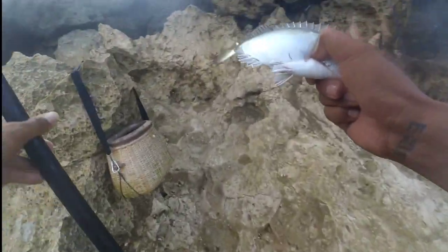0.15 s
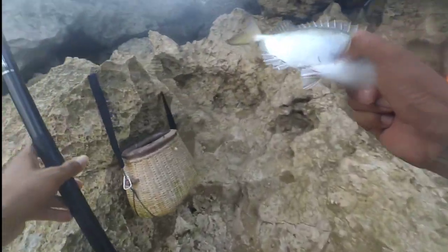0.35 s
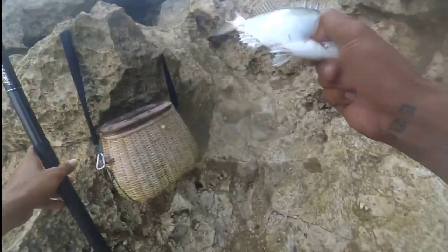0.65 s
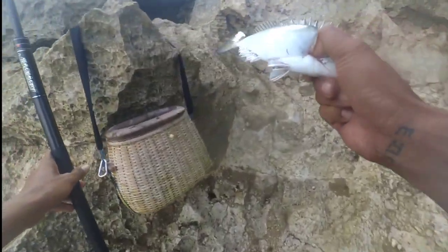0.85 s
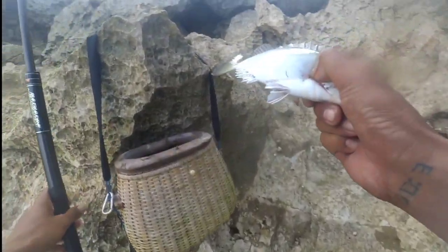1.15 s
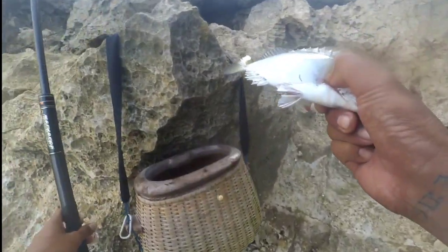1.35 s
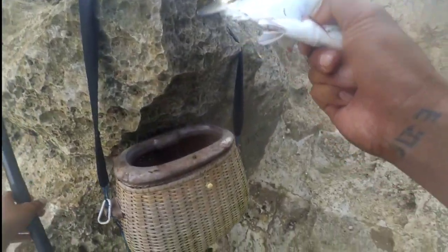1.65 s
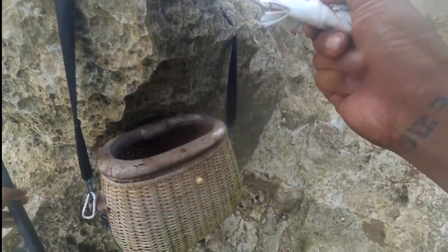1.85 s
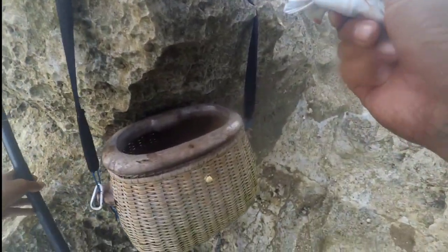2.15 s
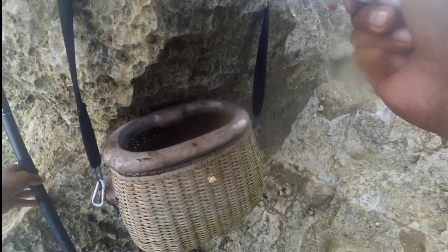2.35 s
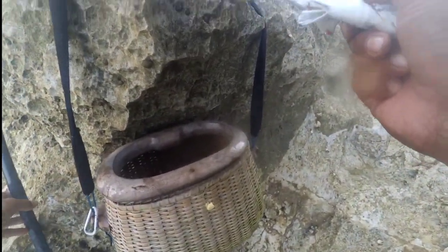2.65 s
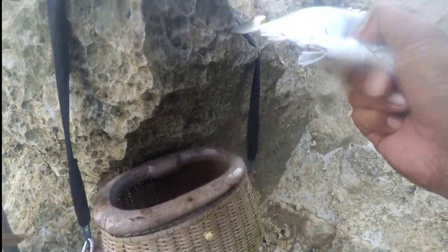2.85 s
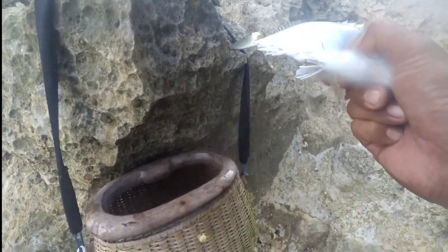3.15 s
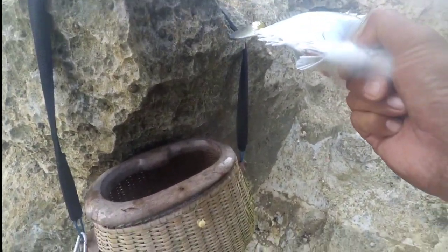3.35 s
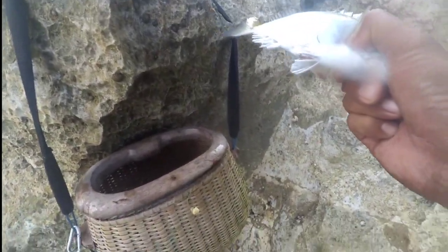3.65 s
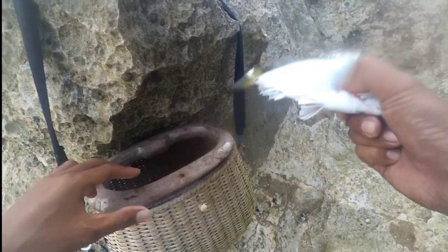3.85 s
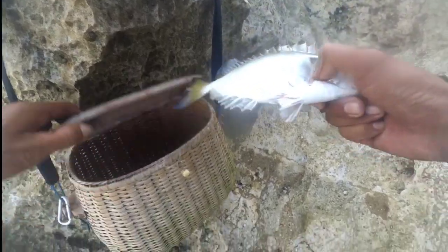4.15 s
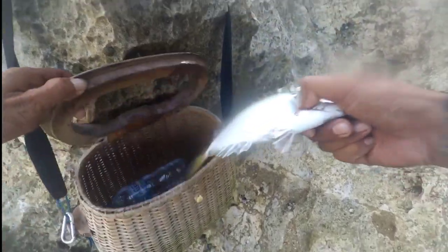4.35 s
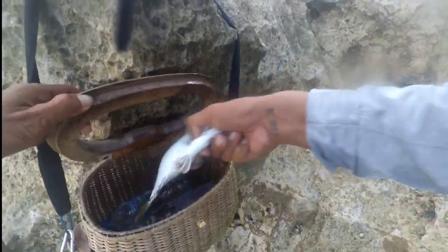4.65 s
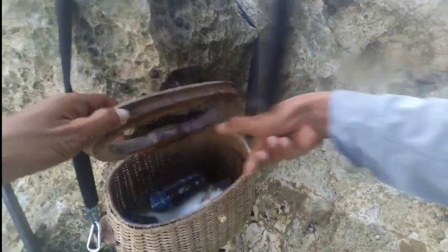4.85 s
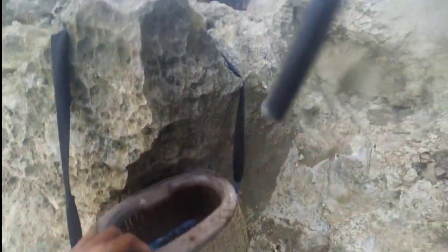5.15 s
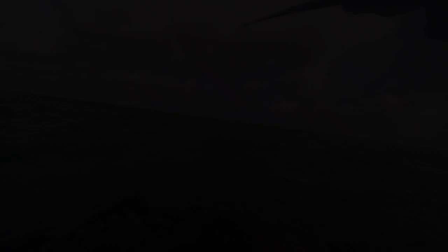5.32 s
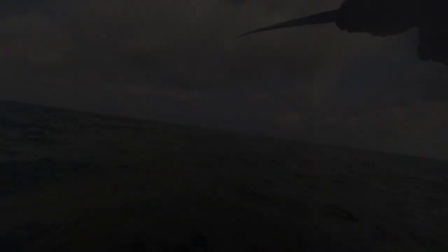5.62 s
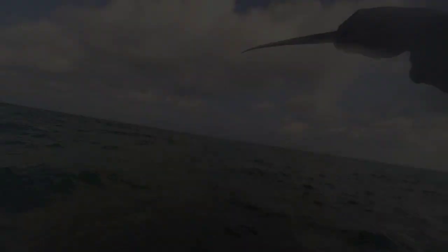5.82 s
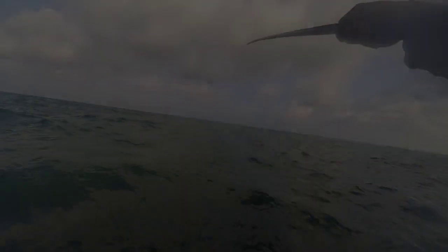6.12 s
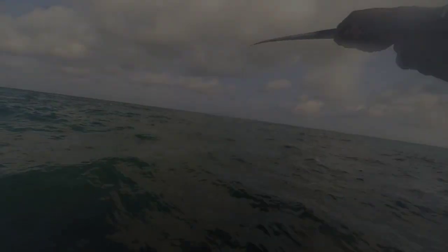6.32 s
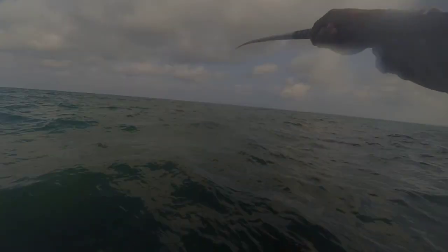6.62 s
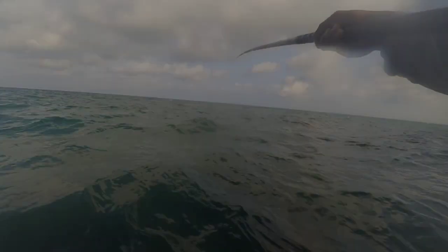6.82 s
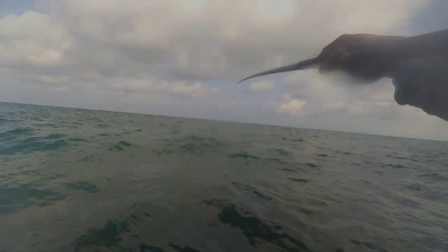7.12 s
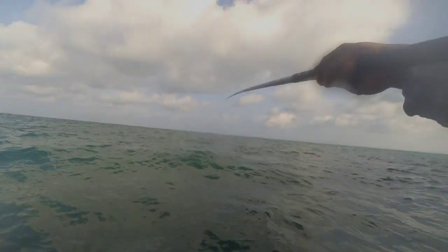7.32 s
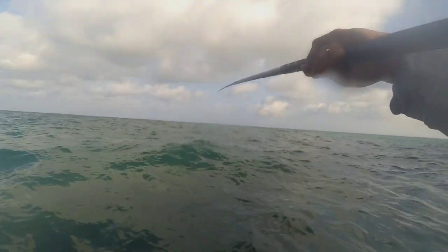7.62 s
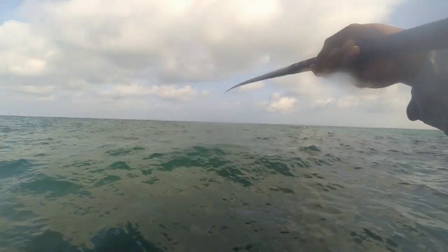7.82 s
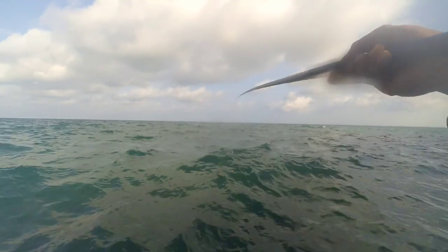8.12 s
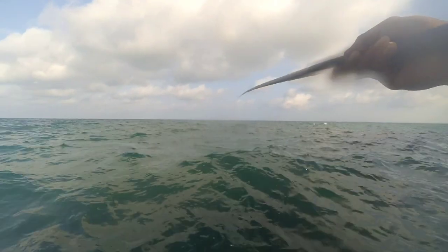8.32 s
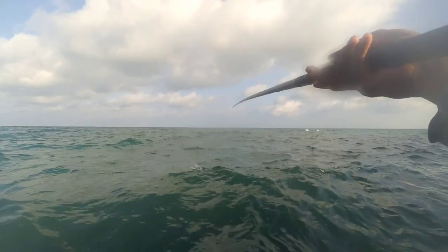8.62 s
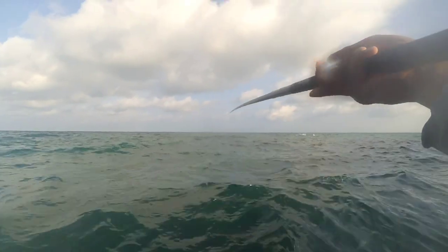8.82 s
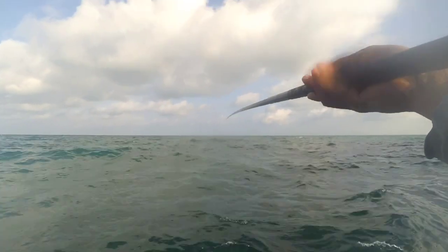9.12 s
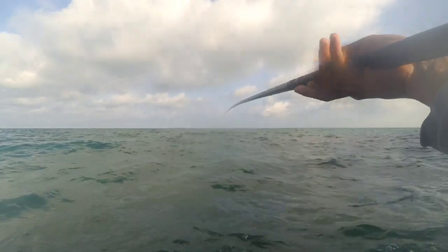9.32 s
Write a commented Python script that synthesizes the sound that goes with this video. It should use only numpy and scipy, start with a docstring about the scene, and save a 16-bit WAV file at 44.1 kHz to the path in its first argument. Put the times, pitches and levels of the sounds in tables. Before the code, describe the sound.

Outdoors by the sea, boxy and coloured by a body-worn camera housing. Water swells and eases at rocks while the wearer shifts, clicking, scraping and knocking the case and handling a basket. After the hardest knocks, a quick change brings closer open water: slosh, gurgle, bright fizz, plinks and spray ticks, a brief creak and soft knocks, ending on calmer laps.

```python
"""Sea water washes against shore rocks, then gives way to water that laps and fizzes close by in the open.
It is heard inside a body-worn waterproof camera case, whose resonances colour filtered noise and bubbles.
The case clicks, knocks, creaks and scrapes as its wearer moves and handles a rustling wicker basket: struck
modes and stick-slip noise. Decaying sines make its soft bumps and the single twang of something taut."""
import sys
import numpy as np
from scipy import signal
from scipy.fft import rfft, irfft, next_fast_len
from scipy.io import wavfile
from scipy.ndimage import uniform_filter1d

SR = 44100
rng = np.random.default_rng(int(sys.argv[2]) if len(sys.argv) > 2 else 0)


def unload_audio(sound):
    """Save the sound as a 16-bit wav file, at the path given as the first command line argument."""
    columns = np.transpose(np.atleast_2d(sound))
    # keep every value between -1 and 1, then stretch to whole-number steps
    steps = np.round(np.clip(columns, -1, 1) * 32767)
    wavfile.write(sys.argv[1], SR, steps.astype(np.int16))


N = 417627
TIME = np.arange(N) / SR  # s
FREQ = np.maximum(np.fft.rfftfreq(N, 1 / SR), 1)  # Hz
HIT_SIZE = 4096  # samples in one short impact
HIT_FREQ = np.maximum(np.fft.rfftfreq(HIT_SIZE, 1 / SR), 1)  # Hz
HIT_TIME = np.arange(HIT_SIZE) / SR  # s


def undb(db):
    """Amplitude ratio: 20 dB is a factor of ten."""
    return 10 ** (np.asarray(db) / 20)


def unit(x):
    """Root-mean-square normalisation to 1."""
    return x / np.sqrt(np.mean(x ** 2) + 1e-20)


def colour(points, f):
    """Spectral envelope: gain at frequencies f, interpolated in dB over log frequency."""
    hz, db = np.transpose(points)
    return undb(np.interp(np.log(f), np.log(hz), db))


# Resonances at which the case passes air-borne sound differently.
# Each row: centre in Hz, full width at half the lift in Hz, lift in dB.
CASE_LIFT = [(720, 48, 2), (1234, 163, 8.5), (1450, 177, 4), (2166, 366, 5.5), (2517, 540, 9),
             (3140, 220, -1.5), (3560, 91, 4.5), (4184, 1650, 10), (6360, 1400, 3)]


def case_gain(f):
    """Transmission resonance: bell-shaped changes that the closed case gives to sound from outside."""
    lift_db = sum(db * .5 ** ((2 * (f - hz) / width) ** 2) for hz, width, db in CASE_LIFT)
    return undb(lift_db)


def ring(modes, f, polarity):
    """Modal superposition: complex response of damped modes, each next one scaled by polarity once more."""
    response = 0
    for k, (hz, width, db) in enumerate(modes):
        detuning = (f * f - hz * hz) / (f * width)
        response = response + polarity ** k * undb(db) / (1 + 1j * detuning)
    return response


def walk(rate):
    """Slow random modulation: levels drawn rate times a second and slewed, with rms 1."""
    k = int(SR / rate)
    held = np.repeat(rng.standard_normal(N // k + 1), k)
    return unit(uniform_filter1d(held, k)[:N])


def add(out, s, sound):
    """Linear superposition of a sound at time s."""
    i = int(np.clip(s * SR, 0, N - 1))
    out[i:i + len(sound)] += sound[:N - i]


def swell(s, length):
    """Asymmetric Gaussian envelope: a quick rise to a crest at time s and a slower ebb."""
    rise = 0.36  # share of the length, which is taken between the 1/e amplitude points
    width = length * np.where(TIME < s, rise, 1 - rise)
    return np.exp(-((TIME - s) / width) ** 2)


def swells(table):
    """Power addition of overlapping (crest s, length s, dB, ...) swells, one curve for each level column."""
    return sum(np.outer(undb(levels), swell(s, length)) ** 2 for s, length, *levels in table)


def over(rest_db, power):
    """Power addition: level in dB of a swelling power on top of a resting level."""
    return 10 * np.log10(undb(rest_db) ** 2 + power)


def bubble(hz, cycles, glide):
    """Bubble resonance: trapped air decays by 1/e in the given cycles while its pitch rises."""
    age = np.arange(int(5 * cycles * SR / hz) + 2) * hz / (SR * cycles)  # in decay times
    return np.exp(-age) * np.sin(2 * np.pi * cycles * age * (1 + glide * age))


def bubbles(low_hz, high_hz, cycles, spread_db, count):
    """Statistical superposition of a bubble cloud: many faint, a few strong."""
    out = np.zeros(N)
    for when, pitch, size, life in rng.random((count, 4)):
        hz = low_hz * (high_hz / low_hz) ** pitch
        # strengths in dB are spread exponentially, up to a ceiling
        rank = min(-np.log(size), 3)
        # low-pitched bubbles ring longer, so they start more gently
        strength = undb(spread_db * rank) * np.sqrt(hz / high_hz)
        add(out, when * TIME[-1], strength * bubble(hz, cycles * (.5 + life), 0.0094))
    return unit(out)


def water(source, points, layers, flicker_db):
    """Subband modulation of churning water in the case: (low Hz, high Hz, level curve) layers surge apart."""
    size = next_fast_len(N)
    f = np.maximum(np.fft.rfftfreq(size, 1 / SR), 1)
    sound = rfft(source, size) * colour(points, f) * case_gain(f)
    centres = [np.log2(lo * hi) / 2 for lo, hi, _ in layers]
    surges = []
    for lo, hi, db in layers:
        layer_rms = np.std(irfft(sound * (f > lo) * (f < hi), size))
        surges.append(db - 20 * np.log10(layer_rms))
    surges = np.array(surges)
    out, step = 0, .75  # octaves between overlapping bands
    for octave in np.arange(5.25, 14.5, step):
        window = np.maximum(1 - abs(np.log2(f) - octave) / step, 0)
        band = irfft(sound * window, size)[:N]
        # each band follows its nearest layers and flickers a little on its own
        shares = np.array([np.interp(octave, centres, layer) for layer in np.eye(len(layers))])
        out = out + band * undb(shares @ surges + flicker_db * walk(22))
    return out


# Spectrum of the wash. Each row: frequency in Hz, relative density in dB per Hz.
SHORE_COLOUR = [(40, 9.5), (130, 4.5), (450, 2), (800, -1.5), (1700, -5.5), (3100, -9.5), (5500, -11),
                (9000, -18), (15000, -23.5)]
# Swells of the wash at the rocks, and at 0.55 s cloth rubbing over the case, before the final gain.
# Each row: crest in seconds, length in seconds, flow level in dB, hiss level in dB.
SHORE_SWELLS = [(0.05, 2, -58.5, -61.5), (0.55, 0.5, -55.5, -67), (1.4, 1.7, -56.5, -65),
                (2.2, 2.1, -92.5, -62.5), (2.8, 0.36, -55, -67), (4.22, 1.3, -61, -62)]


def shore():
    """Turbulent noise and bubble resonance: a smooth wash at the rocks with a little gurgle, and one cloth rub."""
    flow, foam = swells(SHORE_SWELLS)
    gurgle = undb(-11.5) * bubbles(503.6, 9780, 6.2, 3.8, count=5000)
    source = rng.standard_normal(N) + gurgle
    # resting levels in dB keep the wash going between swells
    layers = [(600, 2600, over(-58, flow)), (3200, 8000, over(-61.5, foam))]
    return undb(-1.04) * water(source, SHORE_COLOUR, layers, flicker_db=0.33)


# The wearer shifts: the case sways and cloth drags over it.
# Each row: peak in seconds, length in seconds, sway level in dB, rub level in dB.
MOVES = [(0.03, 0.16, -22, -54.5), (0.36, 0.36, -29.5, -50), (0.49, 0.21, -17, -46), (0.68, 0.11, -19, -55),
         (1.25, 0.57, -31, -76), (2.15, 0.17, -33.5, -56.5), (4.95, 0.4, -34, -57), (5.92, 0.85, -29, -55),
         (6.7, 0.43, -34.5, -77), (7.35, 0.48, -31, -52), (7.85, 0.95, -34, -89), (8.95, 0.43, -34.5, -60)]
# Spectrum of the sway. Each row: frequency in Hz, relative density in dB per Hz.
SWAY_COLOUR = [(3, 5.5), (7, 16), (11, 18), (20, -5), (30, -9.5), (40, -31), (50, -20), (90, -44),
               (200, -81)]


def sway():
    """Quasi-static pressure change: very deep swings as the case moves with the body."""
    swing = irfft(rfft(rng.standard_normal(N)) * colour(SWAY_COLOUR, FREQ), N)
    # the swings are evened out, so the strength of the movement alone sets their size
    power = uniform_filter1d(uniform_filter1d(swing ** 2, SR // 6), SR // 6)
    push, _ = swells(MOVES)
    still_db = -44.5  # sway while standing still
    return undb(over(still_db, push)) * swing / np.sqrt(power)


# Spectrum of friction on the case. Each row: frequency in Hz, gain in dB.
RUB_COLOUR = [(80, 0), (400, -10), (900, 1.5), (1800, 1.5), (2500, 0), (3200, -6), (5000, -10.5),
              (7000, -10.5), (14000, -26.5)]


def rubbing(grain_db, tilt_db, catch_db):
    """Stick-slip friction: cloth grips and slips while the wearer moves, catching unevenly."""
    _, drag = swells(MOVES)
    grip_db = grain_db * np.tanh(walk(400)) + catch_db * np.tanh(walk(60))
    slips = rng.standard_normal(N) * undb(grip_db)
    tilt = undb(tilt_db * np.log2(np.maximum(FREQ, 500) / 2000))  # dB per octave
    body = case_gain(FREQ) * colour(RUB_COLOUR, FREQ) * tilt
    return np.sqrt(drag) * unit(irfft(rfft(slips) * body, N))


# Modes of the shell when tapped directly; the 3000 Hz wide one is the crack of the contact.
# Each row: frequency in Hz, width in Hz, level in dB before tilt or thud.
SHELL_MODES = [(138, 60, -16.5), (720, 470, -14), (1270, 300, -2), (1775, 114, 1), (2186, 94, 1.5),
               (2810, 110, 5), (3385, 78, 2), (3940, 280, 4), (3930, 3000, -5), (5460, 230, -38),
               (6960, 460, -11.5)]
# Sharp clicks on the shell. Each row: start in seconds, rms level of the first 10 ms in dB,
# tilt in dB per octave about 2 kHz, thud gain below 300 Hz in dB, damping as a factor on mode width.
CLICKS = [(0.0942, -22.5, 5, 1.5, 1.12), (0.2926, -32, -3, -9, 1.4), (0.5504, -24, -4.5, -17, 4),
          (1.1042, -39.5, -6.5, 12, 1.4), (1.5147, -31, 6, -17, 0.72), (1.5217, -30.5, 4.5, -14, 0.9),
          (2.184, -35.5, 8, 14, 1.6)]


def clicks(rattle_s, rattle_db, hard_hz):
    """Impulse excitation of modes: hard taps ring the shell, with milliseconds of rattle after contact."""
    out = np.zeros(N)
    contact = signal.butter(4, hard_hz, fs=SR, output="sos")
    noises = rng.standard_normal((len(CLICKS), HIT_SIZE))
    for (s, db, tilt_db, thud_db, damping), noise in zip(CLICKS, noises):
        push = (HIT_TIME == 0) + undb(rattle_db) * noise * np.exp(-HIT_TIME / rattle_s)
        # a harder contact favours the high modes; a heavier one adds the thud of the mount;
        # a lingering one damps the ring
        modes = []
        for hz, width, mode_db in SHELL_MODES:
            change_db = thud_db if hz < 300 else tilt_db * np.log2(hz / 2000)
            modes.append((hz, width * damping, mode_db + change_db))
        tap = irfft(rfft(push) * ring(modes, HIT_FREQ, -0.95))  # neighbours swing oppositely
        tap = signal.sosfilt(contact, tap) + undb(-16.0) * tap
        add(out, s, undb(db) * tap / np.std(tap[:SR // 100]))
    return out


# Modes of the case when knocked through its mount.
# Each row: frequency in Hz, width in Hz, level in dB before thud.
MOUNT_MODES = [(108, 99, 0), (204, 46, -10), (525, 106, -8), (749, 78, -7), (942, 206, -4), (1074, 146, -6),
               (1368, 160, -1), (1741, 151, -10), (2291, 366, -1)]
# Between its modes the mount stands still, which makes a knock hollow.
# Each row: frequency in Hz, width in Hz.
MOUNT_DIPS = [(367, 180), (658, 133), (1216, 98), (1645, 66)]
# Hollow knocks of the mount. Each row: start in seconds, peak level in dB,
# thud gain below 300 Hz in dB, dullness as the dB lost at 2 kHz.
KNOCKS = [(0.2922, -32, -20, 15), (0.5502, -17, -19, 12), (1.6697, -26.5, -10.0, 10.0),
          (1.7204, -31, -10, 13.0), (1.8131, -26.5, -7, 8.5), (1.8965, -28, -2.5, 10),
          (1.9491, -30.5, -4.0, 16), (2.013, -39, 9.0, 6.0), (2.0949, -27.5, 0.0, 12.0),
          (2.1842, -24, 8, -4), (2.2078, -29, 0.5, 23), (2.2768, -27, 2.5, 11), (4.0272, -27, 1, 10.0),
          (4.0916, -24.5, 1.5, 10.5), (4.3944, -20.0, -1, 8.5), (4.5804, -15, 0.0, 7.0),
          (4.8342, -33, 8, 8), (4.9858, -14.5, -1.5, 8.0), (5.2029, -34, 19, 5), (5.7533, -31.5, 0, 2),
          (5.937, -33, 6, 8), (5.9548, -30.5, 6.0, 9), (6.0956, -32, 11, 5.0), (6.1163, -31.5, 8.0, 6),
          (6.1286, -37, 8, 4), (6.1376, -30, 7, 6), (6.171, -36.5, 11, 9.0), (6.406, -31, 3, 2),
          (7.4409, -33.5, 6, 7), (7.4565, -29, 6.5, 8), (7.6243, -29, 8, 7), (7.6367, -28, 6.5, 3.5),
          (7.6685, -37.5, 1, 12)]


def knocks(jerks, soft_hz, edge_db):
    """Modal excitation with antiresonances: the mount slips in jerks, soft pushes that ring the whole case."""
    out = np.zeros(N)
    # the case flexes around 1580 Hz: an all-pass spreads the first spike of a knock
    flex = 1 - (HIT_FREQ / 1580) ** 2 + 1j * HIT_FREQ / 1580
    dips = [1 - .92 * ring([(hz, width, 0)], HIT_FREQ, 1) for hz, width in MOUNT_DIPS]
    hollow = np.prod(dips, axis=0)
    soft = signal.butter(10, soft_hz, fs=SR, output="sos")
    dulling = np.minimum(HIT_FREQ / 2000, 1.5) ** 2
    chances = rng.standard_normal((len(jerks), len(MOUNT_MODES)))
    for (s, db, thud_db, dull_db), chance in zip(jerks, chances):
        modes = []
        for (hz, width, mode_db), c in zip(MOUNT_MODES, chance):
            modes.append((hz * (1 + 0.0058 * c), width, mode_db + (hz < 300) * thud_db))
        blow = irfft(ring(modes, HIT_FREQ, 0.99) * hollow)
        blow = signal.sosfilt(soft, blow) + undb(edge_db) * blow
        blow = irfft(rfft(blow) * undb(-dull_db * dulling) * flex.conj() / flex)[:HIT_SIZE // 2]
        add(out, s, undb(db) * blow / abs(blow).max())
    return out


def pluck(s, modes, attack_s):
    """Free decay of (Hz, t60 s, dB) modes after one blow; a softer blow builds more slowly."""
    out, t = np.zeros(N), np.arange(SR // 2) / SR
    tone = 0
    for hz, t60, db in modes:
        tone = tone + undb(db) * np.exp(-np.log(1000) * t / t60) * np.sin(2 * np.pi * hz * t)
    add(out, s, (1 - np.exp(-t / attack_s)) * tone)
    return out


# Soft bumps of the body against the case. Each row: start in seconds,
# level in dB before attack and decay, frequency in Hz, 60 dB decay time in seconds.
BUMPS = [(0.456, -5, 18.8, 0.26), (0.653, -18.5, 12.5, 0.71), (5.213, -5.5, 22, 0.046),
         (7.385, -14, 11.3, 0.51)]


def bumps():
    """Damped low-frequency oscillation: each soft bump is one decaying, very deep sine."""
    return sum(pluck(s, [(hz, t60, db)], attack_s=0.017) for s, db, hz, t60 in BUMPS)


# A hand or sleeve scrapes the case, and the wicker basket rustles brightly from 4.3 to 4.95 s.
# Each row: start in seconds, length in seconds, rub level in dB before the stroke envelope,
# tilt in dB per octave about 2 kHz, squeak in dB relative to the rub, squeak's starting pitch in Hz.
SCRAPES = [(0.4565, 0.013, -37.5, -2.5, -5, 1266), (0.475, 0.016, -40, -3, -9, 2250),
           (0.493, 0.0051, -35, 0.5, -14, 2250), (0.5907, .014, -38, 2.5, -7, 2400),
           (.596, 0.04, -36, -4, -7, 2480), (0.628, 0.016, -31.5, -7, -5, 2380),
           (0.67, 0.058, -46, -6.5, -4.5, 2560), (1.102, 0.028, -44, -2, -20, 2420),
           (2.048, 0.025, -48.5, 1.5, -5, 4290), (2.062, 0.027, -51, 2, -2, 4970),
           (2.123, .022, -52.5, 0, -2, 4320), (2.151, 0.022, -49, 0.5, -5, 2300),
           (2.776, 0.077, -54.5, 4, -25, 2400), (2.853, .009, -48, -7, -6, 1300),
           (4.32, .008, -51.5, 6, 2.5, 4630), (4.425, 0.0074, -44.5, 7.5, -3, 3700),
           (4.833, 0.016, -47, 3.5, -25, 2400), (4.891, 0.007, -52, 7, 0, 4100),
           (4.917, 0.027, -51.5, 6, -6, 3050), (4.955, 0.033, -48, -4, -2, 2580),
           (4.985, 0.025, -44.5, 5, -9, 4250), (5.099, 0.0077, -47, 4, -3, 2850),
           (5.107, 0.079, -46, -3.5, -3, 2580), (5.129, 0.0086, -40, -3.5, -3, 2530),
           (6.108, 0.057, -57, -14, -2, 2560), (7.348, 0.05, -51, -8, -1.5, 2565)]


def scrapes(grain_db):
    """Stick-slip friction: dense slips of a hand, sleeve or wicker, with a hoarse squeak that sinks."""
    out, size = np.zeros(N), 2 * HIT_SIZE
    f = np.maximum(np.fft.rfftfreq(size, 1 / SR), 1)
    body = case_gain(f) * colour(RUB_COLOUR, f)
    squeak_width_hz, squeak_fall = 290, 0.082  # pitch sinks by this share as the stroke slows
    noises = rng.standard_normal((len(SCRAPES), 3, size))
    for (s, length, db, tilt_db, squeak_db, squeak_hz), (noise, grip, chatter) in zip(SCRAPES, noises):
        progress = np.clip(np.arange(size) / SR / length, 0, 1)
        slips = noise * undb(grain_db * np.tanh(unit(uniform_filter1d(grip, size=50))))
        tilt = undb(tilt_db * np.log2(np.maximum(f, 500) / 2000))
        rub = unit(irfft(rfft(slips) * body * tilt))
        waver = irfft(rfft(chatter) * .5 ** ((2 * f / squeak_width_hz) ** 2))
        phase = 2 * np.pi * np.cumsum(squeak_hz * (1 - squeak_fall * progress)) / SR
        squeak = unit(waver * np.sin(phase))
        stroke = np.sqrt(np.sin(np.pi * progress) + 1e-15)
        add(out, s, undb(db) * (rub + undb(squeak_db) * squeak) * stroke)
    return out


# Something taut, plucked as the basket is handled.
# Each row: frequency in Hz, 60 dB decay time in seconds, level in dB before attack and decay.
TWANG = [(427, .32, -38.5), (1225, .09, -42)]


def twang():
    """Free vibration after a pluck: two decaying partials, the higher one dying sooner."""
    return pluck(4.835, TWANG, attack_s=0.00029)


# Spectrum of the open water. Each row: frequency in Hz, relative density in dB per Hz.
OPEN_COLOUR = [(40, 3.5), (130, 2.5), (450, -4.5), (800, -5.5), (1700, -5.5), (3100, -5.5), (5500, -9),
               (9000, -18.5), (15000, -28)]
# Wavelets lapping in open water, before its final gain. Each row: crest in seconds,
# length in seconds, flow level in dB, foam hiss level in dB, deep slosh level in dB.
LAPS = [(5.35, 1, -56, -62, -66.5), (5.65, .3, -65, -63.5, -74), (5.795, 0.15, -54.5, -54, -72),
        (6.25, 0.52, -56.5, -67, -65.5), (6.68, 0.73, -62, -70, -66.5), (8.52, 0.58, -58, -61.5, -75),
        (8.92, 1, -59.5, -63.5, -80), (9.45, 0.6, -56, -61, -78)]


def open_water():
    """Turbulent noise and bubble resonance: wavelets lap close by with slosh, gurgle, fizz and fine spray."""
    flow, foam, slosh = swells(LAPS)
    spray = foam * undb(-14) ** 2  # fine spray thrown up by the foam
    gurgle = undb(-12.5) * bubbles(547.6, 2610, 6.5, 2.4, count=3000)
    fizz = undb(-6.5) * bubbles(2730, 15000, 7.4, 4.2, count=10000)
    # resting levels in dB keep the water going between laps
    layers = [(200, 600, over(-69, slosh)), (1000, 2600, over(-61, flow)),
              (3200, 6000, over(-72, foam)), (7500, 14000, over(-76.5, spray))]
    source = rng.standard_normal(N) + gurgle + fizz
    return undb(3.0) * water(source, OPEN_COLOUR, layers, flicker_db=1.5)


# The nearest drops and bubbles. Each row: start in seconds, level in dB before decay, starting pitch
# in Hz, cycles to decay by 1/e, glide as half the share by which pitch rises per decay time.
DROPS = [(5.239, -42, 680, 3, 0.18), (5.755, -43, 573, 7.6, .004), (5.81, -36.5, 2240, 11, .003),
         (5.8581, -38.5, 2550, 12, .003), (6.208, -42, 2050, 12, 0.011), (6.29, -42.5, 3540, 28, .003),
         (6.2932, -40.5, 1270, 14, .003), (6.3649, -34.5, 2350, 4.4, .01), (6.708, -48.5, 372, 11, .08),
         (6.958, -44, 3680, 14, .003), (7.035, -38, 1390, 2.7, .01), (7.566, -38.5, 1150, 10, .035),
         (8.023, -46.5, 2110, 11, .003), (8.1165, -46.5, 3700, 16, .003), (8.162, -45, 2240, 9.5, 0.011),
         (8.3052, -38.5, 2530, 8.4, 0.018), (8.354, -44, 1100, 11, 0.1), (8.419, -44, 3560, 20, .003),
         (8.618, -38.5, 3680, 12, .003), (9.0117, -38, 3540, 15, 0.0033), (9.174, -42.5, 3560, 27, .003)]


def drops():
    """Bubble resonance: the nearest drops plink above the fizz as single decaying tones."""
    out = np.zeros(N)
    for s, db, hz, cycles, glide in DROPS:
        add(out, s, undb(db) * bubble(hz, cycles, glide))
    return out


# Flecks of spray ticking on the case. Each row: start in seconds, peak level in dB, centre in Hz.
FLECKS = [(5.812, -32, 2800), (5.861, -33, 4700), (5.9825, -43.5, 8800), (6.222, -45, 5500),
          (6.294, -40, 3800), (6.942, -37, 2700), (8.1356, -45, 5700), (8.3272, -41, 3200),
          (8.3757, -49, 5000), (8.9732, -51, 5500), (9.039, -40, 3400), (9.166, -43, 6240),
          (9.3129, -53, 5800), (9.3306, -36.5, 4080), (9.4558, -37.5, 5000)]


def flecks():
    """Transient noise excitation: each fleck of spray bursts in a brief band-limited crackle."""
    out = np.zeros(N)
    decay_s, spread_octaves = 0.0025, 0.45
    for (s, db, hz), noise in zip(FLECKS, rng.standard_normal((len(FLECKS), HIT_SIZE))):
        band = np.exp(-.5 * (np.log2(HIT_FREQ / hz) / spread_octaves) ** 2)
        crackle = irfft(rfft(noise) * band) * np.exp(-HIT_TIME / decay_s)
        add(out, s, undb(db) * crackle / abs(crackle).max())
    return out


# Creaks of the mount in runs of small slips. Each row: start in seconds, length in seconds,
# typical peak level in dB, typical gap between slips in seconds.
CREAKS = [(7.274, .105, -38, 0.018), (7.523, .042, -39.5, .009)]


def creaks():
    """Stick-slip motion: nearly even runs of little knocks, as (s, peak dB, thud dB, dB lost at 2 kHz)."""
    jitter, scatter_db, thud_db, dull_db = .25, 2, -3, 6
    slips = []
    for (start, length, db, gap_s), chance in zip(CREAKS, rng.standard_normal((len(CREAKS), 16, 2))):
        s = start
        for gap, size in chance:
            if s < start + length:
                slips.append((s, db + scatter_db * size, thud_db, dull_db))
            s += gap_s * np.exp(jitter * gap)
    return slips


def scene():
    """Linear superposition of water and handling sounds, alike in both ears."""
    # equal-power move from the rocks to the open water: 43 ms centred on 5.2 s
    at_sea = np.clip((TIME - 5.2) / 0.043 + .5, 0, 1)
    sea = np.sqrt(1 - at_sea) * shore() + np.sqrt(at_sea) * open_water() + drops() + flecks()
    hits = knocks(KNOCKS + creaks(), soft_hz=2700, edge_db=-38)
    hits = hits + clicks(rattle_s=0.0031, rattle_db=-22.0, hard_hz=7700)
    friction = scrapes(grain_db=6.5) + rubbing(grain_db=5.0, tilt_db=-4.5, catch_db=6)
    return np.tile(sea + hits + friction + twang() + bumps() + sway(), (2, 1))


# Faint, mostly very deep noise. Each row: frequency in Hz, relative density in dB per Hz.
FAINT_NOISE_COLOUR = [(20, 33), (70, -11), (130, -34), (300, -31), (600, -34), (1200, -49), (4000, -64),
                      (15000, -62)]


def record(dry):
    """Uncorrelated noise and band limiting: faint deep noise drawn for left and right, then a low-pass."""
    noise = unit(irfft(rfft(rng.standard_normal((2, N))) * colour(FAINT_NOISE_COLOUR, FREQ), N))
    low_pass = signal.ellip(8, .2, 70, 15500, fs=SR, output="sos")  # cutoff in Hz
    return signal.sosfilt(low_pass, dry + undb(-47.0) * noise)


dry = scene()
out = record(dry)
unload_audio(out)
```